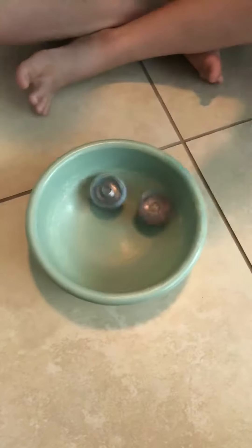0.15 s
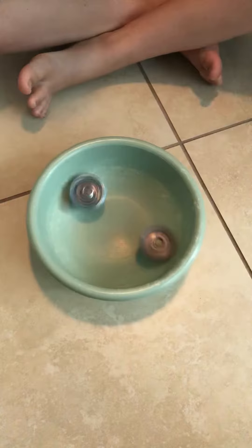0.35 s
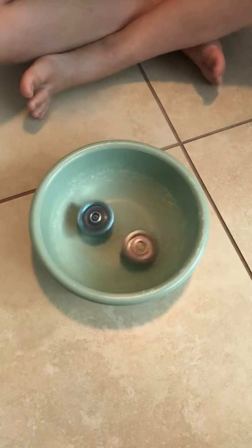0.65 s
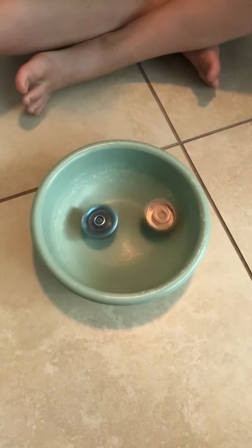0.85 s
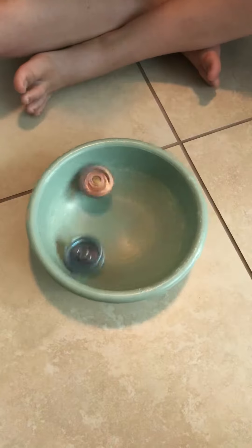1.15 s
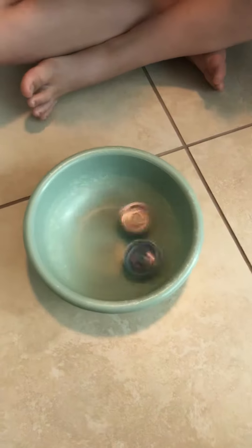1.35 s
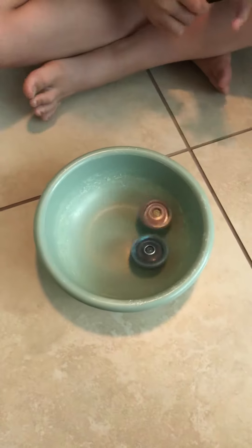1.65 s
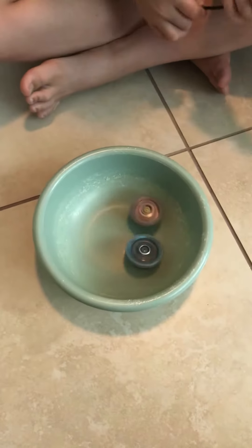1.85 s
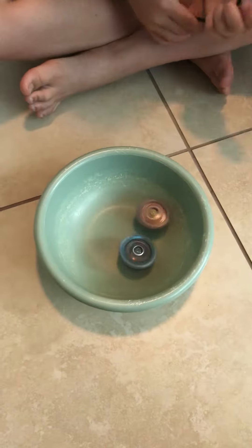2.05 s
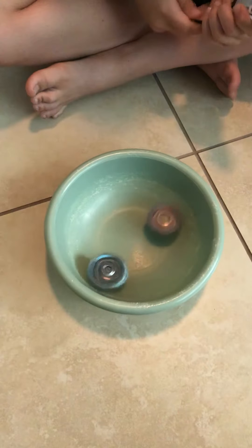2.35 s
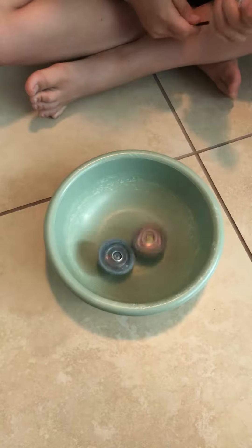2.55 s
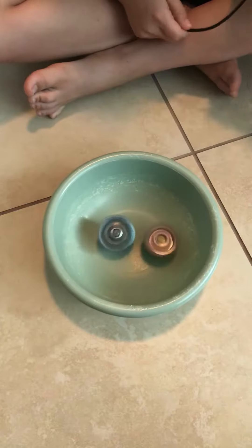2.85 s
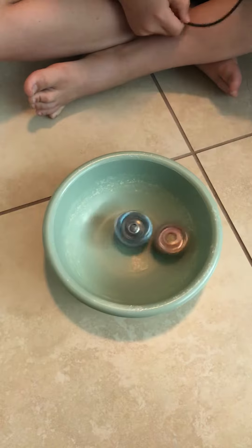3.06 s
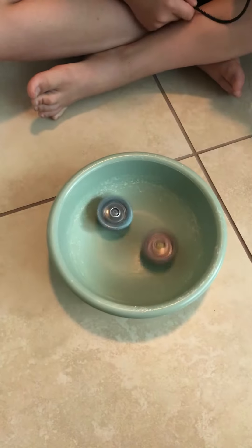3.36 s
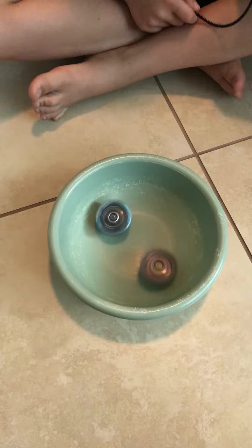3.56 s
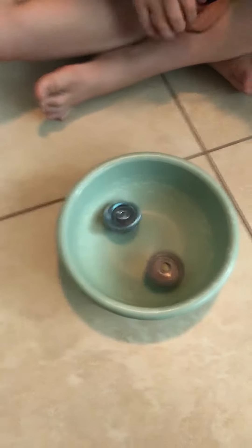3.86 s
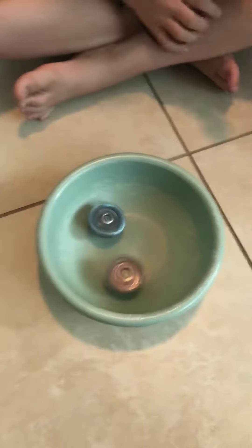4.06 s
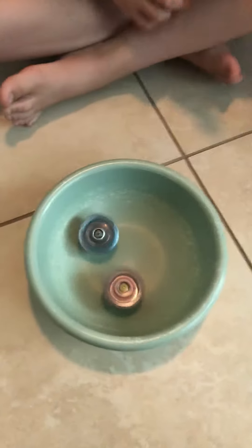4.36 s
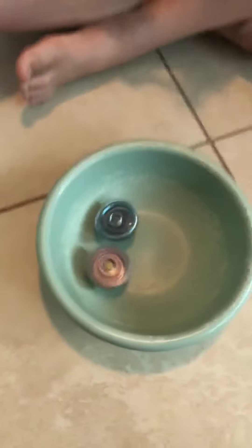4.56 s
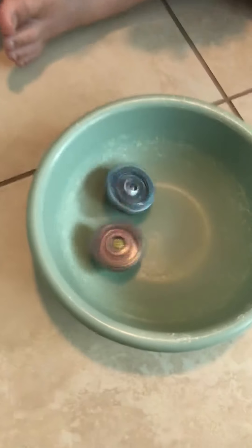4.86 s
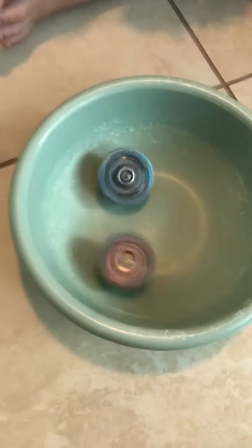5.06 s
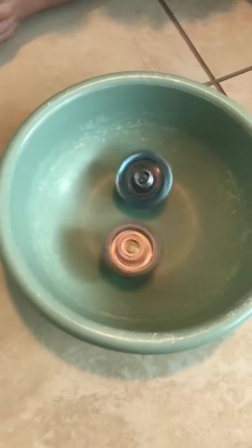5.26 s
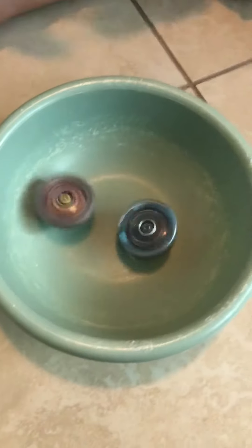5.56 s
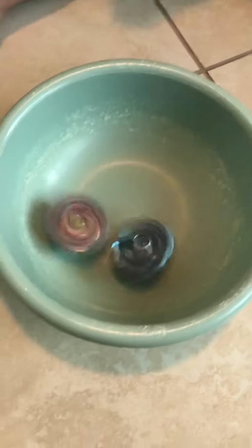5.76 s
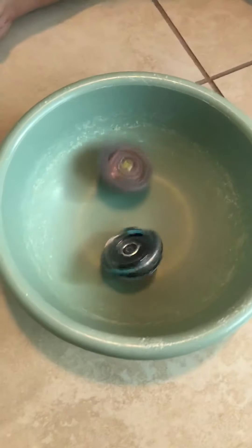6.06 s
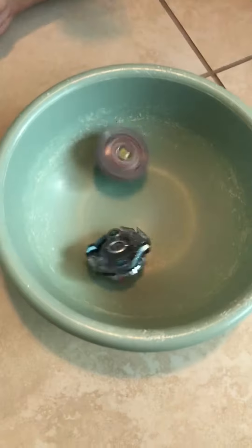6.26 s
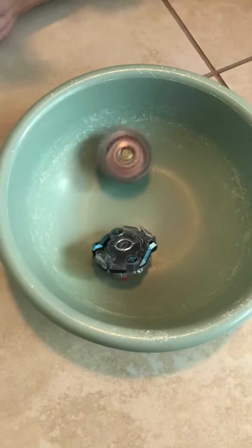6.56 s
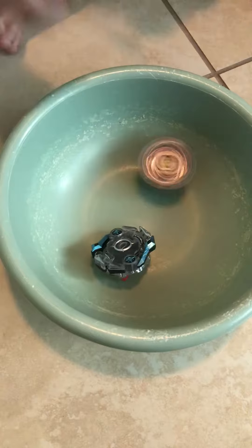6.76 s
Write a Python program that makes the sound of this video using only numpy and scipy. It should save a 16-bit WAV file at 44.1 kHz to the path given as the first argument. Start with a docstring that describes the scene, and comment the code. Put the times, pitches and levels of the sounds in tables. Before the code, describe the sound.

Spinning tops clash in bursts inside a hollow plastic bowl, whirr softly between hits, then one is knocked over with a crack and fluttering rumble.

```python
"""Spinning tops battling in a bowl

Two spinning tops circle in a plastic bowl on a tiled floor, until one is knocked over and the other runs on alone.
Clashing rims and hopping tips strike modes of bowl, shells, rims and floor as dying sines.
Between blows, dense random taps make the tips scrape, whirr and rumble; filtered noise adds a thin tone and two skids.
Two wall echoes and sparse room tails throw the sound back, over a steady hush of shaped noise."""
import sys
import numpy as np
from scipy import signal
from scipy.fft import rfft, irfft
from scipy.io import wavfile
from scipy.ndimage import uniform_filter1d

SR = 44100
rng = np.random.default_rng(int(sys.argv[2]) if len(sys.argv) > 2 else 0)


def dump_mix(stems):
    """Bounce the given channels to the path in sys.argv[1] as a 16-bit WAV at rate SR."""
    frames = np.atleast_2d(stems).T  # one column per channel
    limited = np.clip(frames, -1, 1)  # hard clip at full scale
    pcm = np.round(limited * 32767).astype(np.int16)
    wavfile.write(sys.argv[1], SR, pcm)


N = 305172


def amp(db):
    """Decibels to gain."""
    return 10 ** (np.asarray(db) / 20)


def evened(x):
    """Scales to rms 1."""
    return x / np.sqrt(np.mean(x ** 2) + 1e-20)


def read(points, hz):
    """Reads a (frequency, value) table along log frequency."""
    f, value = np.transpose(points)
    return np.interp(np.log(hz + 1), np.log(f + 1), value)


def add(mix, s, sound):
    """Adds a sound at time s, cut off at the end of the mix."""
    part = mix[round(s * SR):][:len(sound)]
    part += sound[:len(part)]


def ring(modes, extra_db=0., detune=0.94):
    """Impulse response of dying modes, neighbours in opposite sign so that the gaps between them fill."""
    hz, db, t60 = np.transpose(modes)[:, :, None]
    t = np.arange(2600) / SR
    sign = (-1) ** np.arange(len(modes))[:, None]
    envelope = amp(db + extra_db - 60 * t / t60)
    waves = sign * envelope * np.sin(2 * np.pi * hz * detune * t)
    return waves.sum(0) / np.sqrt(len(modes))


# spectrum of the house air: (frequency [Hz], relative density [dB per Hz])
HUSH = [(25, 2.5), (45, 3.5), (90, -1.5), (220, -11.5), (600, -20), (1500, -17), (3500, -19.5), (6000, -26),
        (16000, -57.5)]
HUSH_DB = -53.5  # rms level


def hush():
    """Steady air of the house: white noise shaped by a fixed spectrum."""
    hz = np.fft.rfftfreq(N, 1 / SR)
    spectrum = rfft(rng.standard_normal(N)) * amp(read(HUSH, hz))
    return amp(HUSH_DB) * evened(irfft(spectrum, N))


# walls: (delay [ms], level [dB])
ECHOES = [(18.4, -9), (31.3, -15.5)]
# decay of the bare room: (frequency [Hz], t60 [s])
ROOM = [(200, 0.93), (700, 0.96), (2000, 0.68), (5000, 0.61), (12000, 0.45)]


def room(x, rattled, wet_db=2.0):
    """Two wall echoes of the chattering blows, then three sparse tails in turn, each band dying at its own speed."""
    out = np.zeros(N)
    for ms, db in ECHOES:
        add(out, ms / 1000, amp(db) * rattled)
    starts = np.arange(300, SR - 20, 20)
    for k in range(3):
        # one reflection of random sign at a random place in every 20 samples
        taps = np.zeros(SR)
        taps[starts + rng.integers(0, 20, len(starts))] = rng.choice([-1., 1.], len(starts))
        hz, t, z = signal.stft(taps, SR, nperseg=256)
        decay = amp(-60 * t / read(ROOM, hz)[:, None])
        tail = signal.istft(z * decay, SR, nperseg=256)[1]
        tail *= 1 - np.exp(-(np.arange(len(tail)) / SR / 0.0029) ** 2)  # reflections gather over the first moments
        # the send to each tail swings at 37 Hz, a third of a cycle apart
        turn = np.sqrt(2 / 3) * np.cos(2 * np.pi * (37 * np.arange(N) / SR + k / 3))
        out += amp(wet_db) * signal.fftconvolve(x * turn, tail / np.linalg.norm(tail))[:N]
    return out


# a thin tone wanders over the whirr: (time [s], pitch [Hz], level [dB])
SING = [(4.1, 1677, -71), (4.26, 1690, -50.5), (4.501, 1930, -56.5), (5.15, 1896, -65),
        (5.329, 1438, -51.5), (5.65, 1460, -59.5)]


def sing(width_hz=110):
    """Lumpy grit through one narrow moving resonance."""
    s, hz, db = np.transpose(SING)
    t = np.arange(round(s[0] * SR), round(s[-1] * SR)) / SR
    grit = rng.standard_normal(len(t))
    lumps_db = 6 * evened(uniform_filter1d(rng.standard_normal(len(t)), 700))
    # low-passed grit multiplied by a sine becomes a narrow band around the pitch
    pole = np.exp(-np.pi * width_hz / SR)
    narrow = signal.lfilter([1], [1, -pole], grit * amp(lumps_db))
    tone = narrow * np.cos(2 * np.pi * np.cumsum(np.interp(t, s, hz)) / SR)
    out = np.zeros(N)
    add(out, s[0], evened(tone) * amp(np.interp(t, s, db)))
    return out


# the toppling rim drags on the bowl: (time [s], length [s], level [dB])
SKIDS = [(6.203, 0.024, -34), (6.275, 0.048, -37.5)]


def skids():
    """A dragging rim: dense grit rings a low mode of the rim."""
    out = np.zeros(N)
    mode = ring([(5940, 0, 0.0018)])[:400]
    for s, length, db in SKIDS:
        grit = rng.standard_normal(round(length * SR))
        swell = np.sqrt(np.hanning(len(grit)))
        add(out, s, amp(db) * evened(np.convolve(grit * swell, mode)))
    return out


# the tips travelling over the bowl: (time [s], low rumble level [dB], whirr level [dB], scrape level [dB])
TRAVEL = [(0.0, -43, -56, -32), (.5, -46.5, -49, -38.5), (.7, -49.5, -43, -44.5), (.95, -40, -48.5, -48.5),
          (1.46, -48.5, -55.5, -37.5), (1.81, -55, -68, -48.5), (2.04, -58.5, -85, -62),
          (2.509, -53.5, -57, -44.5), (2.701, -46, -46.5, -40), (2.998, -60.5, -56, -53),
          (3.87, -55.5, -59, -64.5), (4.28, -52, -56, -53), (4.5, -59, -55.5, -60),
          (4.702, -49, -55.5, -52.5), (5.071, -50, -51, -59.5), (5.4, -64, -54.5, -58.5),
          (5.72, -43, -54.5, -49.5), (5.82, -54, -58.5, -54.5), (5.87, -33.5, -42, -39.5),
          (6.34, -40.5, -44.5, -39), (6.671, -47.5, -51.5, -49.5), (6.78, -44.5, -38.5, -44),
          (6.92, -53, -50, -47.5)]
# Modes of four bodies: (frequency before detuning [Hz], level [dB], t60 under a blow [s]).
# The bowl's foot on the tiles, the bowl's floor, the plastic shells, the metal rims.
THUD = [(142, -0.5, 0.029), (231.2, -1, 0.077), (380, 6, 0.03), (718.6, 2.5, 0.052)]
WHIRR = [(910, 7, 0.025), (958, 6, 0.031), (1050, 7.5, .025), (3040, -3, 0.018)]
SHELL = [(2085, 0.1, 0.0038), (3145, 2.57, 0.0048), (3842, 0, 0.0079), (4550, 4, 0.0043)]
RIM = [(6100, 9.15, 0.0016), (8650, 12.94, 0.00068), (10070, 1.9, 0.004), (11630, 1.4, 0.0026),
       (15000, 4.1, 0.0017)]
# the wobbling top bears down once a turn; SPIN_HZ is its rate at TURN_S, where one turn starts
SPIN_HZ, SAG_HZ_PER_S, TURN_S = 44.6, 2.0, 6.42
TOPPLE_S = 5.83  # one top is knocked over, the other runs on alone
THROB_DB, ALONE_THROB_DB = 8, 12  # depth of the beat before and after
ALONE_PITCH = 1.05  # the bowl sounds higher under one top: factor on the modes


def travel():
    """Dense tiny taps of uneven size, beating once a turn, ring bowl, shells and rims and shake the tiles."""
    s, *levels_db = np.transpose(TRAVEL)
    t, out = np.arange(N) / SR, np.zeros(N)
    cut = round(TOPPLE_S * SR)
    soft = 1 - np.exp(-np.arange(2600) / 60)  # the low modes start softly
    turns = SPIN_HZ * (t - TURN_S) - SAG_HZ_PER_S / 2 * (t - TURN_S) ** 2
    throb_db = np.where(t < TOPPLE_S, THROB_DB, ALONE_THROB_DB)
    beat = amp(throb_db * np.exp(-(turns % 1 / .3) ** 2))
    bodies = (THUD, WHIRR, SHELL + RIM)
    tilts, stretches = (-5., 0, -6.), (.7, 1, 1.3)  # dB per octave; factor on t60
    for modes, db, tilt, longer in zip(bodies, levels_db, tilts, stretches):
        level_db = np.interp(t, s, db)
        # a top that rattles hard also hops: the louder the layer, the more its taps bunch up
        bunch_db = np.clip(0.2 * (level_db + 63.0), 1, 2.5)
        lumps = np.minimum(evened(uniform_filter1d(rng.standard_normal(N), 300)), 2.2)
        clumps = amp(bunch_db * lumps) / amp(.115 * bunch_db ** 2)
        taps = rng.standard_normal(N) * (rng.random(N) < 3000 / SR) * clumps  # about 3000 a second
        taps *= beat / np.sqrt(uniform_filter1d(beat ** 2, size=2000))
        layer = np.zeros(N)
        for k, (hz, mode_db, t60) in enumerate(modes):
            # as the tops wander, each mode swells and fades
            drift = uniform_filter1d(uniform_filter1d(rng.standard_normal(N), 3000), 2000)
            driven = amp(2.5 * evened(drift)) * taps
            tilt_db = tilt * np.log2(hz / 1000)  # where negative, light taps reach the high modes less
            for start, part, pitch in ((0, driven[:cut], 1), (TOPPLE_S, driven[cut:], ALONE_PITCH)):
                body = (-1) ** k * ring([(hz * pitch, mode_db + tilt_db, t60 * longer)])
                if hz < 1200:
                    body = body * soft
                add(layer, start, signal.oaconvolve(part, body)[:N - round(start * SR)])
        out += evened(layer) * amp(level_db)
    return out


# Metal rim against rim or bowl wall, clack as level over the first 8 ms:
# (time [s], clack level [dB], rim crack over the clack [dB], ringing pitch before detuning [Hz])
CLASHES = [(.005, -21, -9, 4490), (.067, -31, -11, 2640), (.126, -20, -8.5, 2800), (0.142, -25, -1.5, 2860),
           (.158, -19.5, 5.5, 3285), (0.168, -19.5, 3, 2270), (.365, -25.5, 5, 2840),
           (0.372, -17, 1.5, 2820), (.402, -24.5, -3.5, 2800), (0.461, -27, -6, 2280),
           (1.052, -29, -12, 3380), (1.116, -20, -10, 2770), (1.145, -19.5, -2, 4340),
           (1.152, -18.5, 6, 4370), (1.417, -28.5, 1.5, 3210), (1.421, -22, 6.5, 3220),
           (1.556, -25.5, -8.5, 3630), (2.002, -27.5, 0, 3570), (2.315, -17.5, 1.5, 2390),
           (2.643, -23, 3, 3610), (3.134, -19, 0, 2830), (3.573, -33, -9.5, 3284), (4.92, -25, 2.5, 3830),
           (5.363, -49, 4, 6000), (5.406, -43, -1, 3440), (5.501, -42, 5, 5000), (5.828, -15.5, -5, 2980),
           (5.995, -31, -7.5, 3930), (6.02, -29.5, -4, 1860), (6.194, -30, 1, 5770),
           (6.256, -32.5, -7.5, 2970), (6.299, -34.5, 2.5, 3040)]
# A tip hops and lands on the bowl:
# (time [s], nominal knock peak [dB], shell clack over the knock [dB], pitch of the spot before detuning [Hz])
HOPS = [(0.098, -26, -4, 1180), (0.244, -21.5, -13, 1564), (0.318, -18.5, -4, 1235),
        (0.481, -21.5, 2.5, 1215), (0.576, -17.5, 0, 1170), (0.629, -23, -1.5, 1326),
        (0.823, -26.5, -1, 880), (0.88, -19, 2.5, 1420), (0.933, -24, 3.5, 1510), (0.992, -25, -0.5, 1460),
        (1.024, -27.5, -0.5, 1110), (1.073, -23.5, -9, 1170), (1.227, -17.5, -2, 1595),
        (1.262, -23.5, 8.5, 680), (1.282, -23, 0, 1150), (1.364, -23, -5, 1430), (1.494, -15.5, 1, 1290),
        (1.734, -34, -0.5, 710), (1.778, -33, -1, 1600), (2.05, -31.5, 1, 735), (2.093, -28, 0, 1050),
        (2.347, -25, 6.5, 1500), (2.359, -15.5, -2, 1560), (2.436, -24, 1, 1530), (2.497, -24.5, 1, 821),
        (2.541, -29, -2, 954), (2.568, -31.5, -5, 1480), (2.696, -25, -8, 1100), (2.762, -24, -5.5, 745),
        (2.772, -23.5, 3, 1110), (2.818, -25, 3, 956), (2.865, -26, 1.5, 1170), (3.07, -42, -18, 1290),
        (3.105, -18, -4, 1250), (3.135, -13, -16, 1370), (3.173, -22, 3, 1250), (3.224, -24.5, 1.5, 1056),
        (3.56, -28, -3.5, 1150), (3.607, -25, -2, 995), (3.906, -37.5, -13, 920), (5.443, -37.5, -15, 990),
        (5.849, -17, -2, 794), (5.975, -20, -1.5, 630), (6.123, -23, -0.5, 1080), (6.154, -25.5, 0, 905),
        (6.339, -26, -3.5, 1060), (6.422, -20, -3.5, 950), (6.439, -25.5, -1, 980)]
CLASH_RING_DB = 7  # nominal ringing pitch over the clack
CLASH_KNOCK_DB = -6.5  # a clash reaches the bowl this far under its clack
HOP_CRACK_DB = -6.5  # a landing reaches the rim this far under its clack
CREST_DB = 8  # nominal peak of a knock over its level in the first 8 ms
DAMPED_DB = 5  # under a landing the bowl's broad modes lie this far below the knock
SPOT_DB = 13  # nominal ring of the struck patch over the knock


def all_blows():
    """Clashes and hops as rows: time, pitch and level of what rings out, bowl knock, shell clack, rim crack."""
    rows = []
    for s, db, crack_db, hz in CLASHES:
        rows.append((s, hz, db + CLASH_RING_DB, db + CLASH_KNOCK_DB, db, db + crack_db))
    for s, peak_db, clack_db, hz in HOPS:
        db = peak_db - CREST_DB
        clack = db + clack_db
        rows.append((s, hz, db + SPOT_DB, db - DAMPED_DB, clack, clack + HOP_CRACK_DB))
    return rows


# broad modes of the bowl: (frequency before detuning [Hz], level [dB], t60 [s])
BOWL = [(1068, 6, 0.0037), (1500, 8.5, 0.0067)]
# share of knock, clack and crack that leaves the hollow for the room: (level [dB]) each
SENT_DB = [-5.5, -7.5, -5]
SPOT_T60, SPOT_RISE_S = .03, .0015  # the struck patch rings at its own pitch


def blows():
    """Each blow rings bowl, shells, rims and floor; the contact chatters and the hollow repeats it for a few ms.

    Returns the bare blow for the room, the chattering one for the walls and the one rising from the bowl."""
    bare, rattled, cupped = np.zeros((3, N))
    rows = all_blows()
    luck = rng.standard_normal((len(rows), 3, 2, len(RIM), 1))
    grit = rng.standard_normal((len(rows), 2, 500))
    t = np.arange(grit.shape[2]) / SR
    first = round(.008 * SR)  # levels hold over the first 8 ms
    for (s, spot_hz, spot_db, *levels_db), chances, (contact_grit, hollow_grit) in zip(rows, luck, grit):
        dull_db = np.clip(max(levels_db[:2]) - levels_db[2], -3, 14)
        contact = .0009 * amp(.4 * dull_db)  # seconds; dull blows stay in contact longer
        chatter = contact_grit * (t / contact) ** 0.91 * np.exp(-t / contact)
        hollow = hollow_grit * np.exp(-(t / 0.005) ** 3)
        direct = t == 0
        spread = np.convolve(chatter, amp(4.5) * hollow / np.linalg.norm(hollow) + direct)
        for modes, db, sent_db, (loud, tune) in zip((BOWL, SHELL, RIM), levels_db, SENT_DB, chances):
            count = len(modes)
            lean_db = 0.11 * (db + 6.5) * np.linspace(-1, 1, count)[:, None]  # harder blows reach higher modes
            # every blow varies the modes' levels and pitches
            tap = ring(modes, lean_db + 2 * loud[:count], 1 + .05 * tune[:count])
            size = amp(db) * np.sqrt(.008 * SR)
            risen = np.convolve(tap, spread)
            add(cupped, s, size * risen / np.linalg.norm(risen[:first]))
            short = np.convolve(tap, chatter)
            add(rattled, s, size * short / np.linalg.norm(short))
            add(bare, s + contact, amp(sent_db) * size * tap / np.linalg.norm(tap))
        spot = ring([(spot_hz, spot_db, SPOT_T60)], detune=0.99)
        spot = spot * (1 - np.exp(-np.arange(len(spot)) / SR / SPOT_RISE_S))
        add(cupped, s, spot)
        add(rattled, s, amp(-4.5) * spot)
        thud_db = levels_db[0] - 3.0 + 0.72 * dull_db  # rim on rim barely shakes the floor
        thud = np.convolve(ring(THUD, chances[0, 0, :len(THUD)]), np.hanning(90) / 45)
        add(cupped, s, amp(thud_db) * thud)
    return bare, rattled, cupped


def scene():
    """Tops and bowl in the room, over the hush."""
    bare, rattled, cupped = blows()
    tips = travel() + skids() + sing()
    reflected = room(bare + amp(-12.0) * tips, rattled)
    return (cupped + tips + reflected + hush())[None]


EDGE_HZ = 15850  # upper band limit


def record(dry):
    """Small microphone: notches near 5 and 10 kHz, weak bass, soft overload, band limit."""
    hz = np.fft.rfftfreq(N, 1 / SR)
    notch_db = -5 * np.exp(-((hz - 4950) / 250) ** 2) - 4 * np.exp(-((hz - 10400) / 400) ** 2)
    bass_cut = hz ** 3 / (hz ** 3 + 60. ** 3)
    coloured = irfft(rfft(dry) * amp(notch_db) * bass_cut, N)
    overloaded = 1.3 * np.tanh(coloured / 1.3)
    band = signal.firwin(511, EDGE_HZ, window=("kaiser", 9), fs=SR)
    return signal.oaconvolve(overloaded, band[None], "same")


dry = scene()
out = record(dry)
dump_mix(out)
```